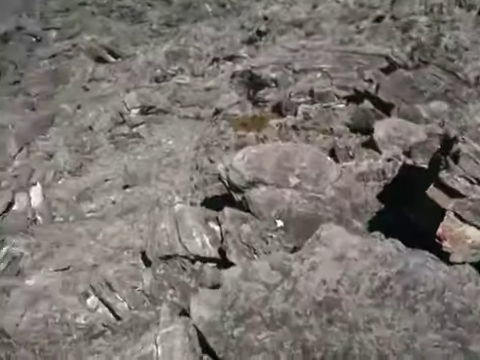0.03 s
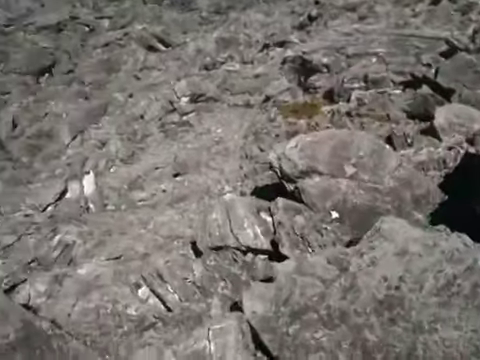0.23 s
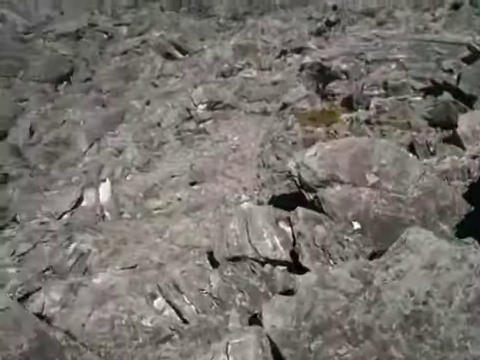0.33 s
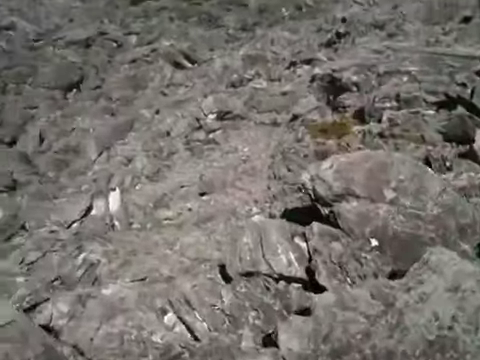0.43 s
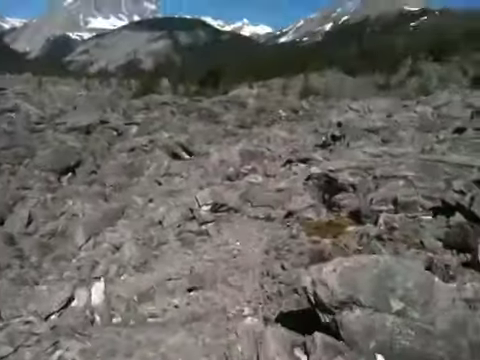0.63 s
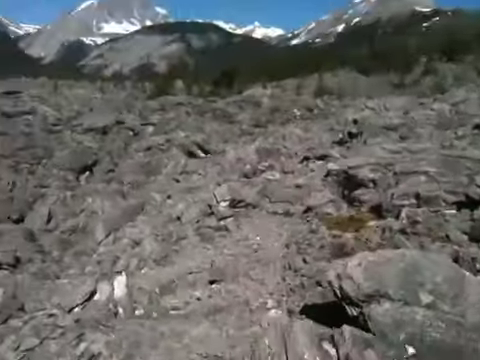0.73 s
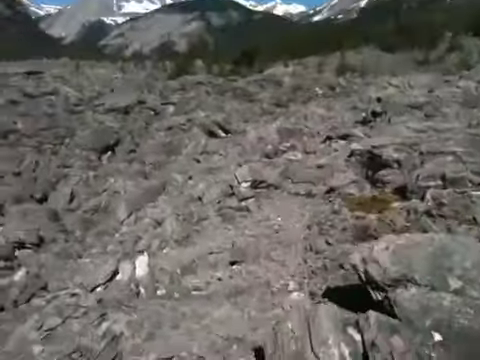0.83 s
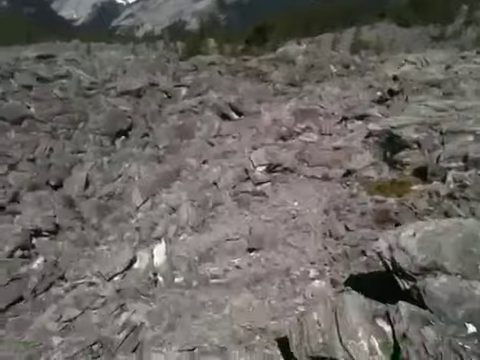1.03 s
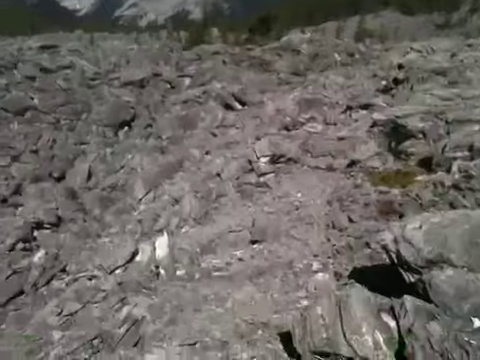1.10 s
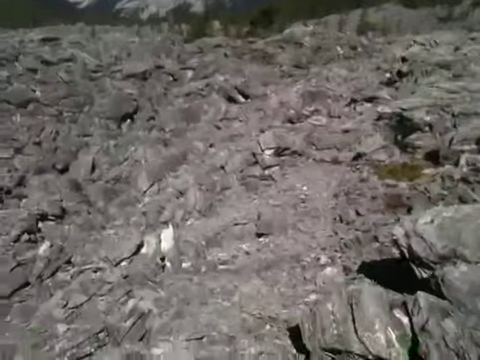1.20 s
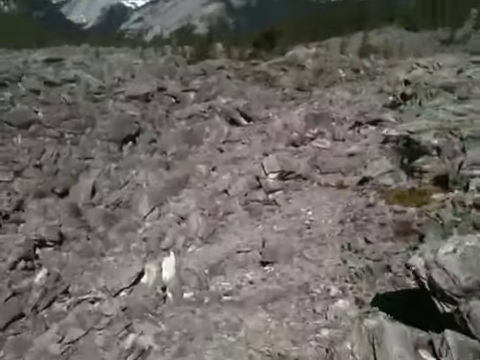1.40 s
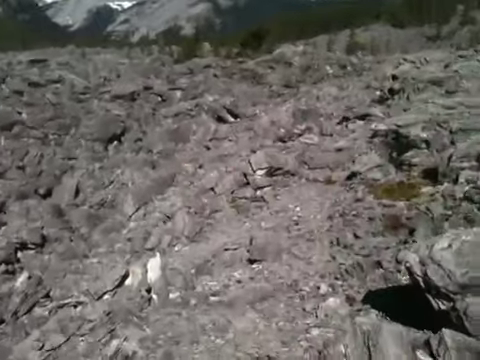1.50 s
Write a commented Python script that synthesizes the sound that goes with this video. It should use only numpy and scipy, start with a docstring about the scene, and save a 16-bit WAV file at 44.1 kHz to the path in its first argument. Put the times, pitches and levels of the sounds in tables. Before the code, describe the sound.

Footsteps on loose stones and grit, a pole cracking on rock, wind buffeting the microphone.

```python
"""An open slope of loose rock, with a walker crossing it. Something hard, probably a pole, cracks
against a stone and chatters, its shaft ringing at each rebound. Boots crunch in bursts of tiny
fractures and scrape on grit; pebbles click, loose stones clunk, small metal gear clinks and clothing
swishes. Wind buffets the microphone in low puffs over a steady breeze and a faint hiss of air."""
import sys
import numpy as np
from scipy import signal
from scipy.io import wavfile
from scipy.ndimage import uniform_filter1d

SR = 44100
rng = np.random.default_rng(int(sys.argv[2]) if len(sys.argv) > 2 else 0)


def store_pcm(level_fs):
    """Save levels as 16-bit WAV."""
    pcm = np.round(np.clip(level_fs, -1, 1) * 32767).astype(np.int16)
    wavfile.write(sys.argv[1], SR, np.atleast_2d(pcm).T)


N = 68355

# colour of the scraping grit and of the air hiss (frequency [Hz], gain [dB])
GRIT_COLOUR = [(300, -10.5), (1000, 0), (2200, 5), (4200, 2.5), (7000, 0), (10000, -11), (12500, -17.5),
               (15000, -17)]


def pole_strikes(size=8000):
    """The tip cracks against stone for a millisecond, then the shaft rings, differently at each blow."""
    # the strike, its rebounds and a later light tap (time [s], shaft gain [dB], crack gain [dB], crack pitch
    # [Hz])
    blows = [(.3840, -11, -2, 4610), (.3857, -48, -13.5, 4700), (.4067, -28.5, -30, 5400),
             (.4126, -25.5, -19, 4100), (.4264, -31.5, -29, 4300), (.5523, -38.5, -28, 5200)]
    # modes of the shaft (frequency [Hz], level [dB], t60 [s])
    shaft_modes = [(686, -12.5, 0.1), (886, -8, 0.036), (1403, 4.5, 0.034), (1790, -2.5, .05),
                   (2222, 0, .034), (2496, -6, 0.039), (3155, 2.5, 0.027), (3636, -11, 0.06),
                   (4300, -6, 0.037), (4490, -7.5, .022), (4690, -8, 0.038), (4800, -3.5, 0.036),
                   (5440, -7, .025), (7760, -11.5, 0.021)]
    # short rings of the tip and the stone it hits (frequency [Hz], level [dB], t60 [s])
    tip_modes = [(2400, -12, 0.0053), (3340, -18.5, .0035), (15100, -32, .006)]
    # colour of the contact noise (frequency [Hz], gain [dB])
    contact_colour = [(150, -24), (1000, -32.5), (2000, 12), (4500, -2), (6500, -8.5), (15000, -17)]
    crack_s, crack_edge_s = 0.0012, 0.00021
    rise_cycles, mode_spread_db = 4.2, 2.2
    tick_db, tick_decay_s = -8, 0.00048
    clatter_db, clatter_decay_s = -10.5, 0.005
    out, t = np.zeros(N), np.arange(size) / SR
    modes = [ring(hz, db, t60) * (1 - np.exp(-t * hz / rise_cycles)) for hz, db, t60 in shaft_modes]
    tip = sum(ring(*mode) for mode in tip_modes)
    contact = np.clip(np.minimum(t, crack_s - t) / crack_edge_s, 0, 1)
    for start, shaft_db, crack_db, hz in blows:
        tick = colour(rng.standard_normal(size) * np.exp(-t / tick_decay_s), contact_colour)
        crack = contact * np.sin(2 * np.pi * hz * t) + amp(tick_db) * tick + tip
        mode_gains = .5 * amp(shaft_db + mode_spread_db * rng.standard_normal(len(modes)))
        shaft = mode_gains @ np.array(modes)
        # noise stands for the dense, quickly dying rings between the shaft's clear modes
        clatter = colour(rng.standard_normal(size) * np.exp(-t / clatter_decay_s), contact_colour)
        add(out, start, shaft + amp(shaft_db + clatter_db) * clatter + amp(crack_db) * crack)
    return out


def boot_crunches(size=5000):
    """Each slip of a stone under a boot is a quickly fading burst of tiny fractures."""
    # slips (time [s], level [dB], decay [s], treble shelf [dB])
    slips = [(.097, -53.5, 0.02, -6.5), (.1405, -59, 0.034, -12), (.349, -47.5, 0.065, -33),
             (.492, -40, 0.016, -10), (.551, -35, 0.011, -1), (.653, -32, 0.0025, -5),
             (.6685, -29.5, 0.0039, 3), (.6836, -24, 0.0042, 0), (.692, -29, 0.0038, 3),
             (.7230, -26, .0016, 15), (.7312, -24.5, 0.0051, -11), (.7345, -22, 0.0044, 10.5),
             (.776, -36.5, 0.0069, 15), (.794, -37.5, 0.0086, -2), (.8671, -34.5, 0.0047, -2),
             (1.016, -45, 0.0054, 10), (1.042, -40, 0.0079, 41), (1.0975, -55, .004, 14),
             (1.142, -48, 0.005, 29), (1.334, -46.5, 0.012, -5), (1.352, -43.5, 0.007, 12),
             (1.3682, -34.5, 0.0046, 15), (1.3907, -32.5, 0.0016, 4), (1.434, -43, 0.0062, 22),
             (1.4525, -43.5, 0.0073, 29), (1.4858, -43.5, 0.0077, 11), (1.5068, -33.5, 0.0026, -1),
             (1.514, -42, 0.0093, 9), (1.529, -39, 0.0066, 7)]
    # colour of breaking grit (frequency [Hz], gain [dB])
    stone_colour = [(60, -25), (250, -4.5), (600, 1.5), (1100, -4.5), (2100, 0), (3000, -7), (4500, 0),
                    (6500, -5), (9500, -9), (12500, -14.5), (15000, -15)]
    attack_s, snap = 0.0006, 0.85
    out, t = np.zeros(N), np.arange(size) / SR
    for start, db, decay_s, treble_db in slips:
        envelope = np.minimum(t / attack_s, 1) * np.exp(-t / decay_s)
        burst = grains(size, per_s=9000, spread_db=3.5) * envelope
        burst[0] += snap  # the first fracture, ahead of the grains
        crunch = signal.fftconvolve(burst, stone_response())
        add(out, start, amp(db) * colour(crunch, stone_colour, treble_db))
    return out


def stone_response(mode_count=12, size=1200):
    """A small stone answers a fracture with a click and a short ring at random pitches."""
    low_hz, high_hz, t60, ring_db = 2080, 13370, 0.0075, -6.5
    pitches = np.exp(rng.uniform(np.log(low_hz), np.log(high_hz), mode_count))
    body = sum(rng.choice([-1, 1]) * ring(hz, 0, t60, size) for hz in pitches)
    hit = signal.unit_impulse(size) + amp(ring_db) * body / np.linalg.norm(body)
    return hit / np.linalg.norm(hit)


def sole_scrape():
    """Fine grit rolls under the soles in a dense, clumpy stream of clicks."""
    # envelope of the scraping (time [s], level [dB])
    envelope = [(0, -58.5), (.08, -72), (.11, -70.5), (.17, -59), (.22, -75), (.28, -75), (.35, -50),
                (.46, -57.5), (.53, -54), (.58, -57), (.63, -56), (.68, -40.5), (.77, -44), (.84, -56),
                (.95, -55.5), (1.05, -58), (1.16, -70), (1.3, -70.5), (1.37, -47.5), (1.41, -55),
                (1.48, -59), (1.55, -52)]
    grit = patchy(grains(N, per_s=9000, spread_db=6))
    return colour(grit * level(envelope), GRIT_COLOUR)


def pebble_clicks(size=8000, attack_s=0.00044):
    """Single pebbles knock together and ring briefly."""
    # clicks (time [s], level [dB], pitch [Hz])
    clicks = [(0.641, -37.5, 2230), (.6836, -30, 1940), (0.893, -44, 2880), (1.001, -41.5, 2500),
              (1.1312, -44, 3710), (1.2107, -50.5, 2230), (1.335, -41, 2364), (1.353, -38, 2250),
              (1.368, -35.5, 2325), (1.3906, -31.5, 2405), (1.507, -34.5, 2310)]
    # modes of a pebble (frequency [multiple of its pitch], level [dB], t60 [s])
    modes = [(.72, -4, 0.017), (1, -1, 0.026), (1.9, -1.5, 0.013), (2.33, -9, 0.016)]
    out, t = np.zeros(N), np.arange(size) / SR
    for start, db, hz in clicks:
        pebble = sum(ring(hz * ratio, db + mode_db, t60, size) for ratio, mode_db, t60 in modes)
        add(out, start, pebble * (1 - np.exp(-t / attack_s)))
    return out


def stone_clunks():
    """Loose stones rock under a boot with a low, short ring."""
    # clunks (time [s], level [dB])
    clunks = [(1.008, -49), (1.3829, -30.5), (1.533, -43)]
    # modes of a rocking stone (frequency [Hz], level [dB], t60 [s])
    modes = [(413, -7, 0.038), (528, 0.5, 0.025), (696, -2, 0.035), (880, -14, 0.022), (1400, -18, .02)]
    out = np.zeros(N)
    for start, db in clunks:
        add(out, start, amp(db) * sum(ring(*mode) for mode in modes))
    return out


def gear_clinks(size=8000, buzz_depth=0.6):
    """Small, loose metal gear buzzes against itself as it rings."""
    # clinks (time [s], pitch [Hz], level [dB], t60 [s])
    clinks = [(.554, 3660, -32.5, 0.039), (.561, 6420, -42, .079), (.697, 14580, -32, 0.041),
              (.7905, 6590, -35.5, 0.068), (.7905, 5114, -35, 0.05), (.7995, 6590, -40.5, 0.13),
              (.7995, 5114, -36.5, 0.035), (.8215, 5114, -49, .18), (1.041, 7224, -45.5, 0.16),
              (1.098, 5070, -54, .057)]
    out = np.zeros(N)
    for start, hz, db, t60 in clinks:
        buzz = unit_rms(uniform_filter1d(rng.standard_normal(size), size=70))
        add(out, start, ring(hz, db, t60, size) * (1 + buzz_depth * buzz))
    return out


def clothing_swish():
    """Cloth rubs with a bright, shifting hiss as the leg swings."""
    # envelope of the swish (time [s], level [dB])
    envelope = [(.26, -82), (.305, -50), (.36, -62.5), (.43, -62), (.51, -54.5), (.59, -44), (.62, -54.5),
                (.66, -42), (.72, -46.5), (.8, -56.5), (1.2, -72), (1.44, -70), (1.55, -60)]
    # colour of the cloth (frequency [Hz], gain [dB])
    cloth_colour = [(1000, -5.5), (4000, -12), (8000, 7), (12000, -3.5), (15000, 1.5)]
    return colour(patchy(rng.standard_normal(N)) * level(envelope), cloth_colour)


def wind_puffs(buffet_width_s=0.0026):
    """Eddies hit the microphone as a stream of low puffs; a few stand out as buffets."""
    # strength of the wind (time [s], level [dB])
    envelope = [(0, -30.5), (.05, -47), (.09, -42.5), (.116, -51.5), (.15, -33.5), (.22, -35),
                (.314, -35.5), (.35, -39), (.41, -29), (.45, -36.5), (.52, -35), (.55, -39), (.63, -35),
                (.69, -32.5), (.74, -36.5), (.81, -36.5), (.884, -44), (1.0, -46), (1.11, -45.5),
                (1.16, -52.5), (1.18, -44.5), (1.29, -54.5), (1.35, -46), (1.48, -46.5), (1.55, -44.5)]
    # colour of the puffs (frequency [Hz], gain [dB])
    rumble_colour = [(25, -45), (50, -29), (80, -19.5), (115, -7), (140, -8), (175, 0), (290, -2.5),
                     (420, -8.5), (650, -18), (1000, -30.5), (5000, -66)]
    # strongest buffets (centre time [s], level [dB], pitch [Hz])
    buffets = [(.190, -34, 236), (.262, -35, 198), (0.29, -24, 270), (0.4026, -28.5, 326), (.408, -23, 225),
               (0.418, -29, 195), (.517, -24.5, 282), (0.58, -26, 254), (0.621, -27.5, 276),
               (.671, -25, 292), (.6855, -23, 246), (0.7022, -22.5, 278), (.755, -30, 296),
               (.787, -23, 230), (.817, -23.5, 258), (0.842, -31, 287), (1.104, -31, 278),
               (1.351, -29.5, 210)]
    puffs = colour(grains(N, per_s=600, spread_db=2.5), rumble_colour)
    running_rms = np.sqrt(abs(uniform_filter1d(puffs ** 2, size=3000)) + 1e-6)
    out = puffs / running_rms * level(envelope)
    t = np.arange(-1000, 1000) / SR
    swell = np.exp(-.5 * (t / buffet_width_s) ** 2)
    for centre, db, hz in buffets:
        add(out, centre + t[0], -amp(db) * swell * np.cos(2 * np.pi * hz * t))
    return out


def breeze(db=-51):
    """A steady breeze lays a low rumble under the puffs."""
    # colour of the breeze (frequency [Hz], gain [dB])
    breeze_colour = [(30, -28.5), (110, 7), (200, 5), (600, -37.5)]
    return amp(db) * colour(rng.standard_normal(N), breeze_colour)


def air_hiss(db=-73):
    """A faint, even bed of open air."""
    return amp(db) * colour(rng.standard_normal(N), GRIT_COLOUR)


def amp(db):
    """Decibels to gain."""
    return 10 ** (np.asarray(db) / 20)


def unit_rms(x):
    """Scales to rms 1."""
    return x / np.sqrt(np.mean(x ** 2) + 1e-20)


def add(mix, start_s, sound):
    """Mixes a sound in at a time."""
    part = mix[max(round(start_s * SR), 0):][:len(sound)]
    part += sound[:len(part)]


def level(curve):
    """Gain envelope through (time [s], level [dB]) points."""
    return amp(np.interp(np.arange(N) / SR, *np.transpose(curve)))


def colour(x, points, treble_db=0, size=4096):
    """Minimum-phase EQ of unit energy through (frequency [Hz], gain [dB]) points, with a treble shelf."""
    hz = abs(np.fft.fftfreq(size, 1 / SR))
    point_hz, point_db = np.transpose(points)
    curve_db = np.interp(np.log(hz + 1), np.log(point_hz), point_db)
    shelf_db = treble_db * hz ** 2 / (hz ** 2 + 6000 ** 2)
    log_gain = np.log(amp(curve_db + shelf_db))
    spectrum = np.exp(np.conj(signal.hilbert(log_gain)))
    taps = np.fft.ifft(spectrum).real[:size // 2]
    return signal.fftconvolve(x, taps / np.linalg.norm(taps))[:len(x)]


def grains(n, per_s, spread_db):
    """Random clicks of uneven strength, rms 1."""
    strength = amp(spread_db * np.minimum(rng.exponential(1, n), 4))
    return unit_rms(strength * rng.choice([-1, 1], n) * (rng.random(n) < per_s / SR))


def ring(hz, db, t60, size=8000):
    """One dying mode."""
    t = np.arange(size) / SR
    return amp(db) * np.exp(-np.log(1000) * t / t60) * np.sin(2 * np.pi * hz * t)


def patchy(x, depth_db=3.5):
    """Grains of different sizes come in clumps, so the colour keeps shifting; rms 1."""
    spectra = signal.stft(x, nperseg=256)[2]
    patches = uniform_filter1d(rng.standard_normal(spectra.shape), size=5, axis=0)
    patches = unit_rms(uniform_filter1d(patches, size=5, axis=1))
    return unit_rms(signal.istft(spectra * amp(depth_db * patches), nperseg=256)[1][:N])


def scene():
    """All sources close to one microphone, with no echo."""
    walker = pole_strikes() + boot_crunches() + sole_scrape() + clothing_swish()
    stones = pebble_clicks() + stone_clunks()
    return (walker + stones + air_hiss() + gear_clinks() + wind_puffs() + breeze())[None]


def record(dry):
    """The microphone sheds deep bass, the hardest crack overloads the input, and the top is cut off."""
    low_cut_hz, ceiling, high_cut_hz = 25, .74, 16300
    lean = signal.sosfilt(signal.butter(1, low_cut_hz, "high", fs=SR, output="sos"), dry)
    clipped = lean / (1 + (lean / ceiling) ** 6) ** (1 / 6)
    lowpass = signal.firwin(511, high_cut_hz, window=("kaiser", 9), fs=SR)
    return signal.oaconvolve(clipped, lowpass[None], "same")


dry = scene()
out = record(dry)
store_pcm(out)
```